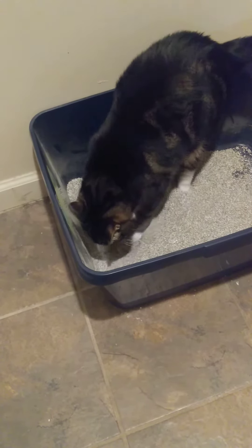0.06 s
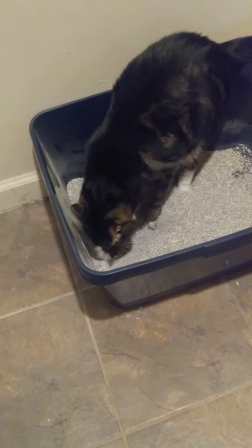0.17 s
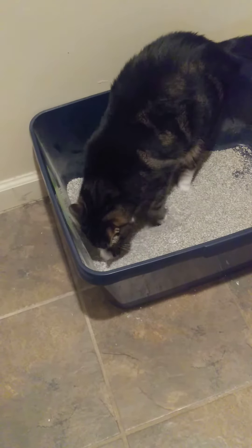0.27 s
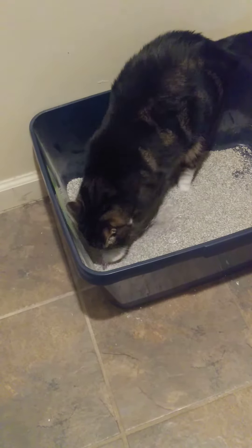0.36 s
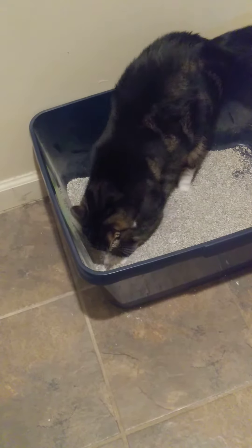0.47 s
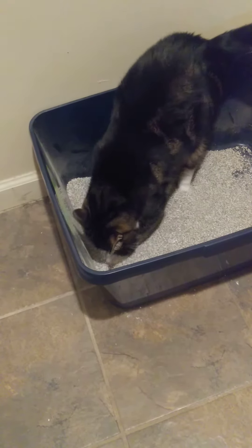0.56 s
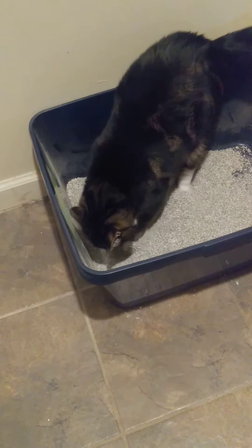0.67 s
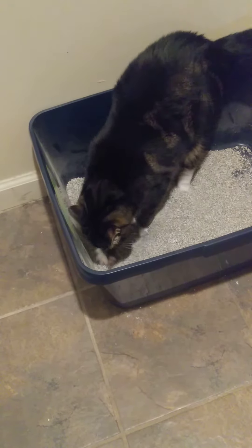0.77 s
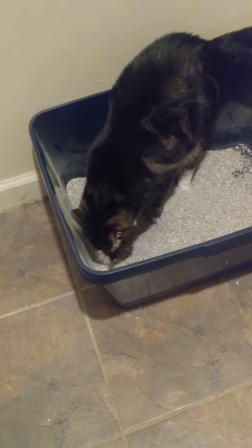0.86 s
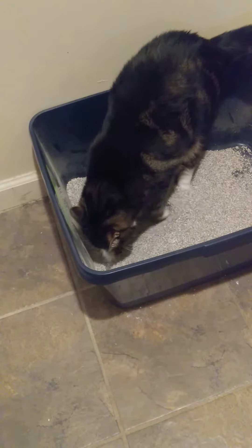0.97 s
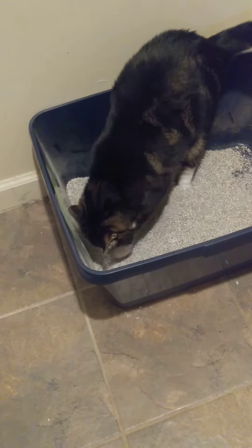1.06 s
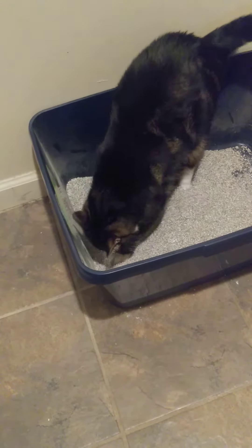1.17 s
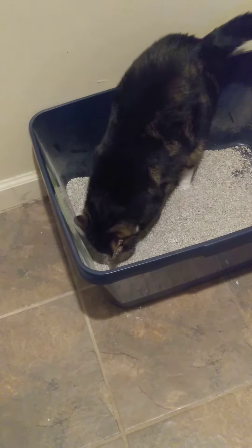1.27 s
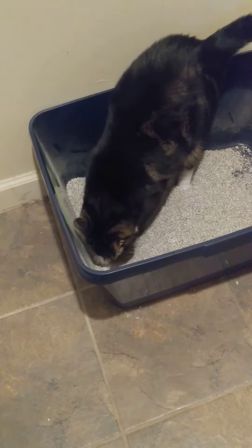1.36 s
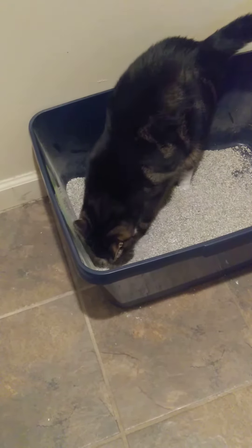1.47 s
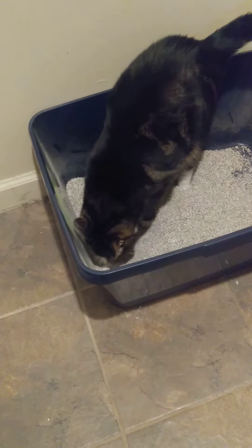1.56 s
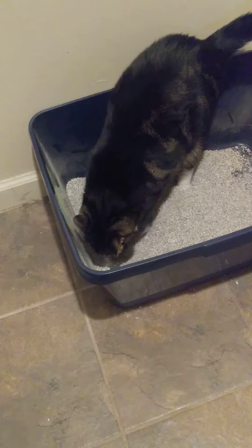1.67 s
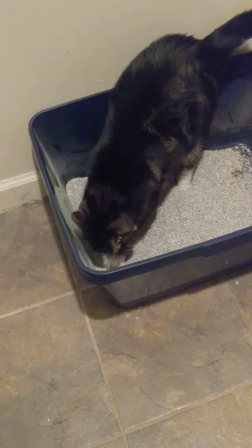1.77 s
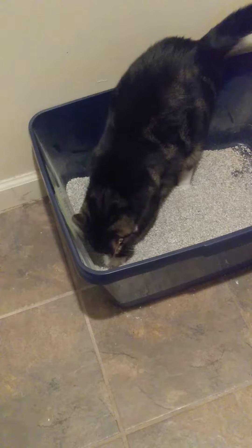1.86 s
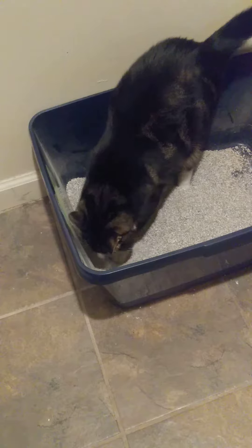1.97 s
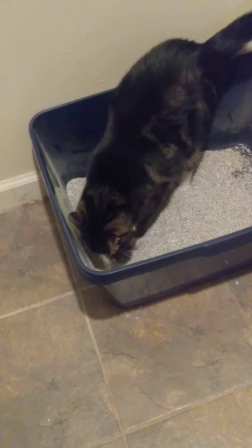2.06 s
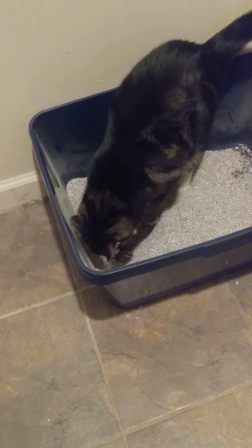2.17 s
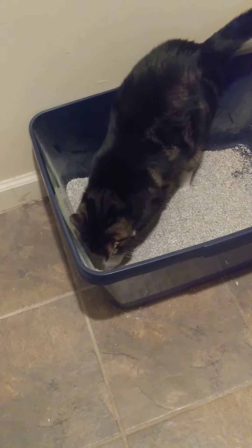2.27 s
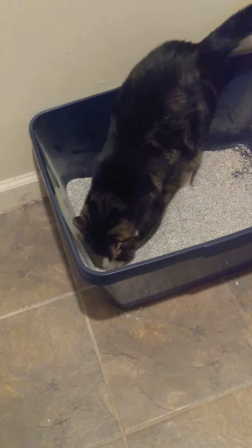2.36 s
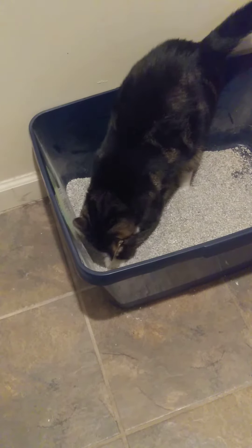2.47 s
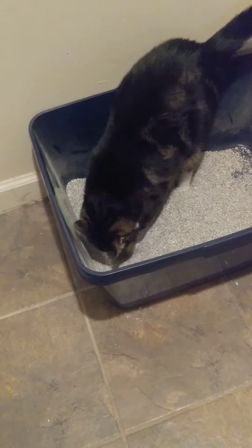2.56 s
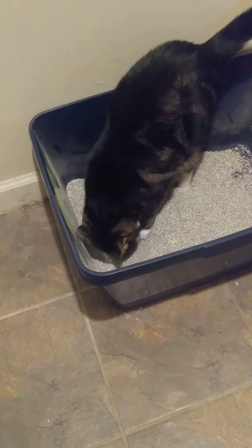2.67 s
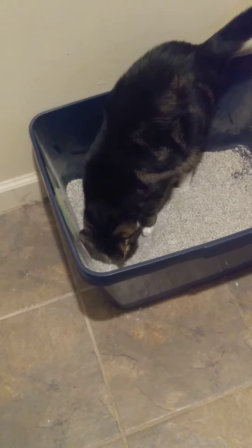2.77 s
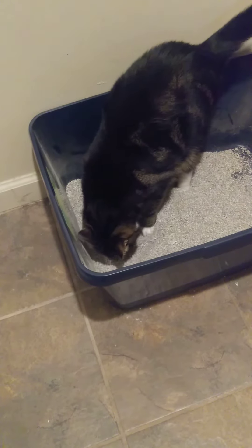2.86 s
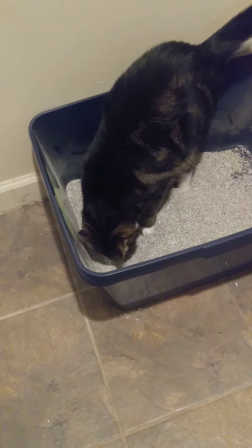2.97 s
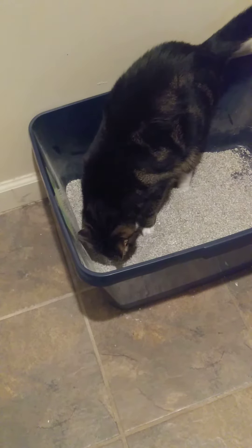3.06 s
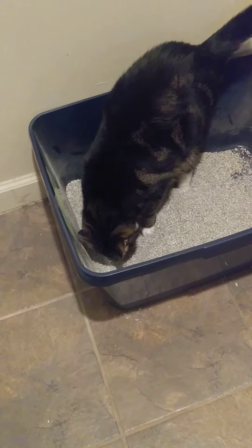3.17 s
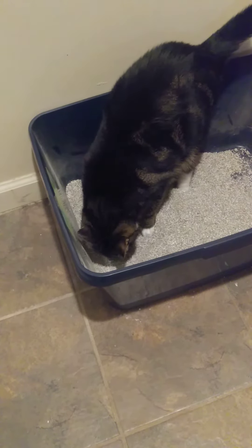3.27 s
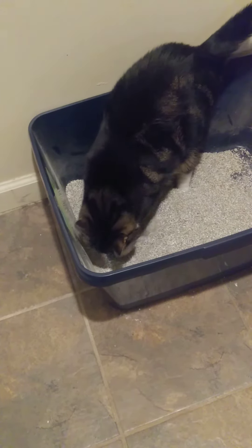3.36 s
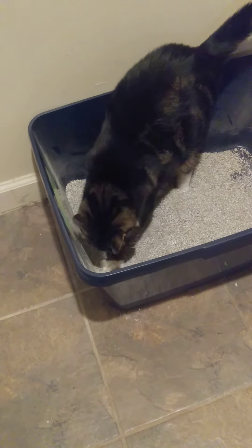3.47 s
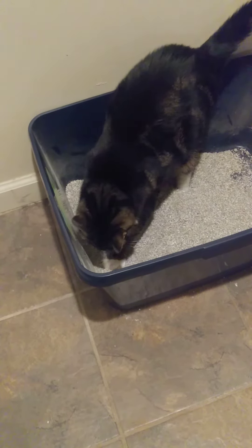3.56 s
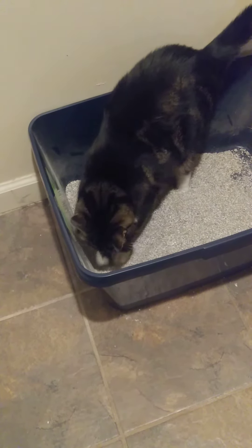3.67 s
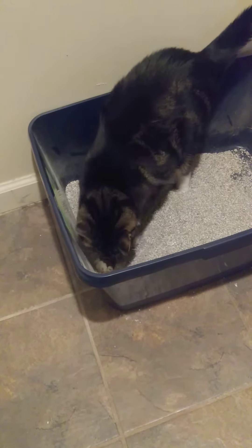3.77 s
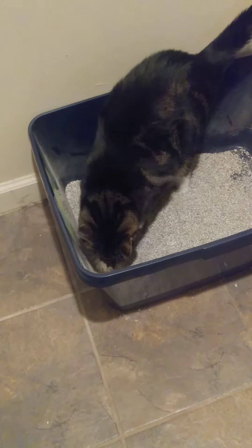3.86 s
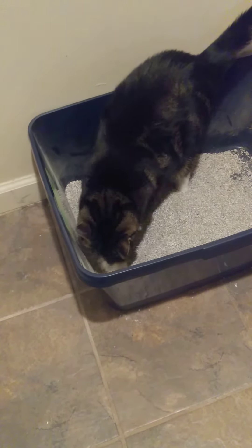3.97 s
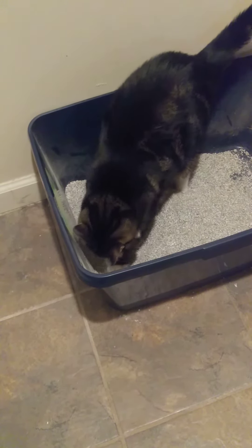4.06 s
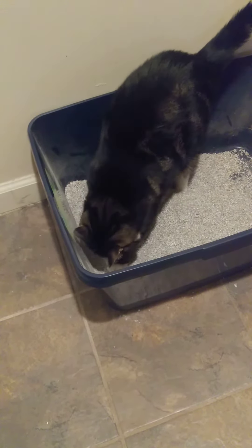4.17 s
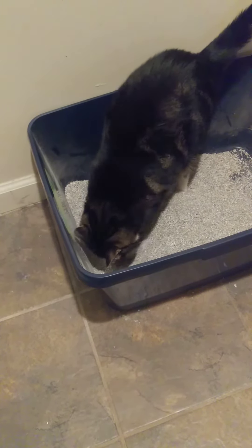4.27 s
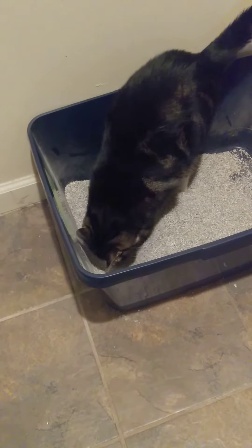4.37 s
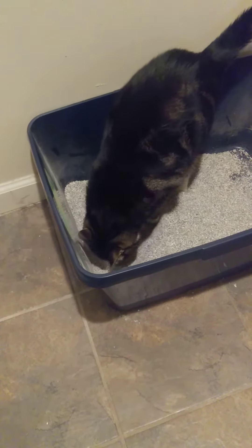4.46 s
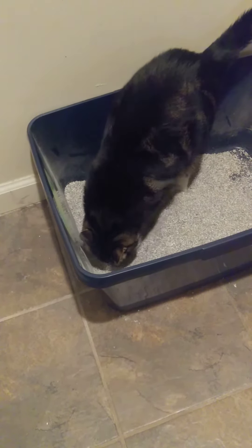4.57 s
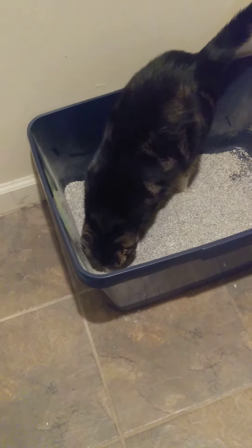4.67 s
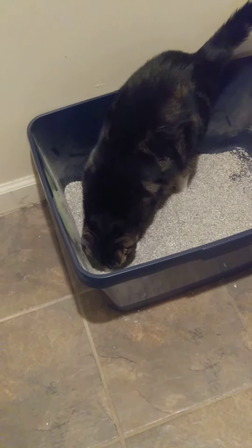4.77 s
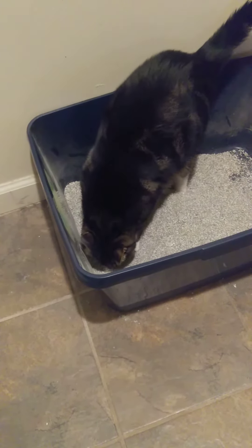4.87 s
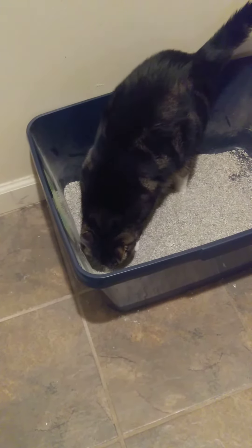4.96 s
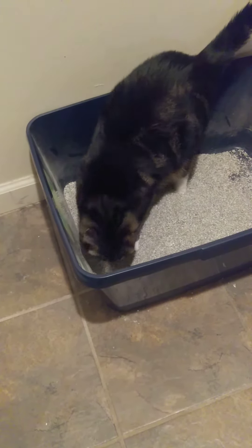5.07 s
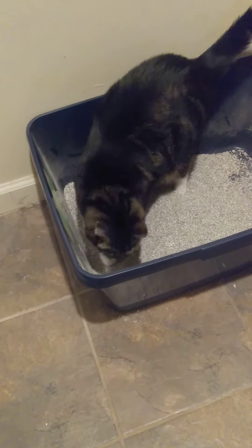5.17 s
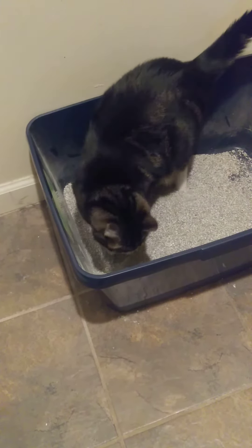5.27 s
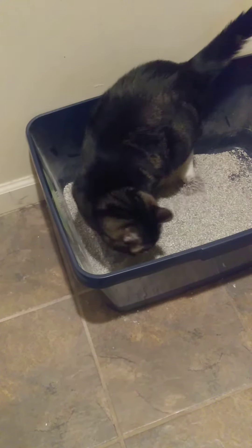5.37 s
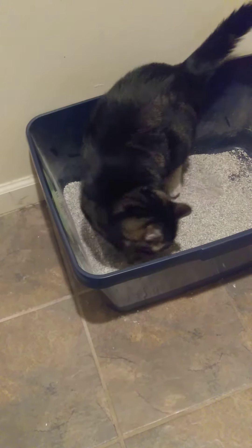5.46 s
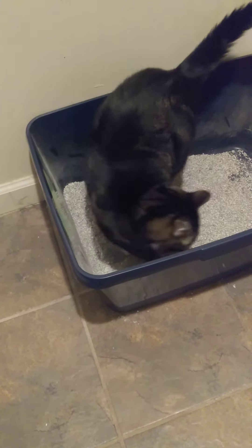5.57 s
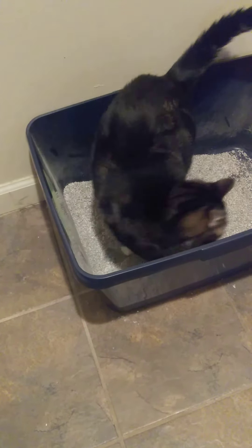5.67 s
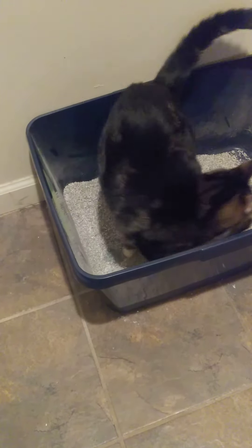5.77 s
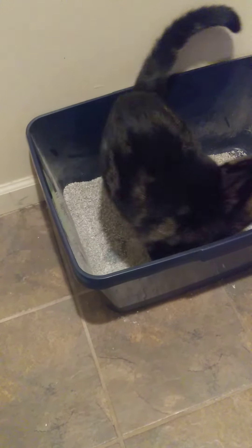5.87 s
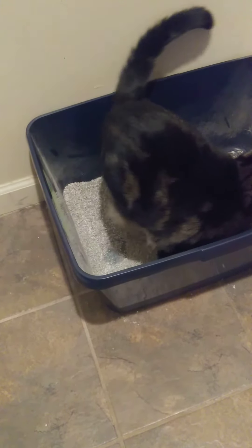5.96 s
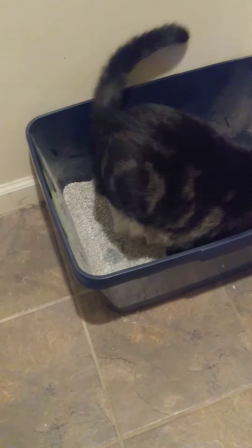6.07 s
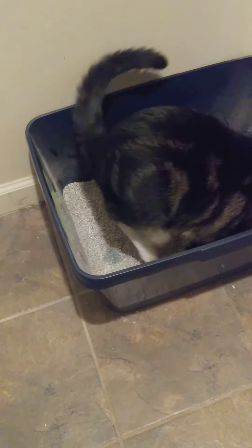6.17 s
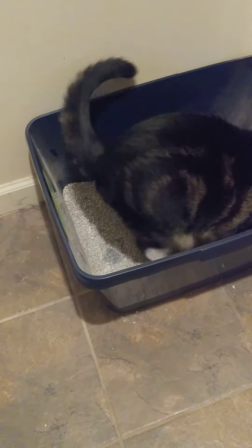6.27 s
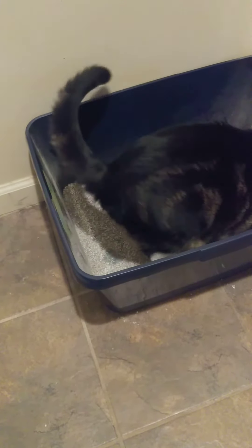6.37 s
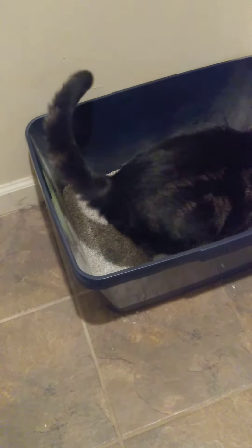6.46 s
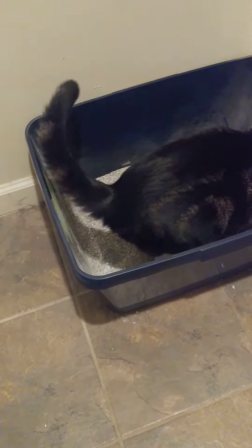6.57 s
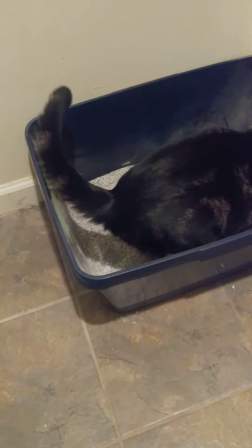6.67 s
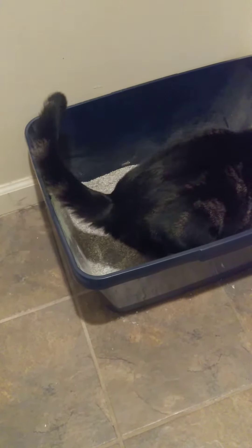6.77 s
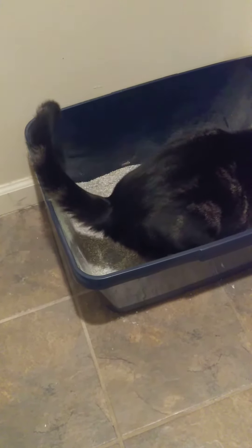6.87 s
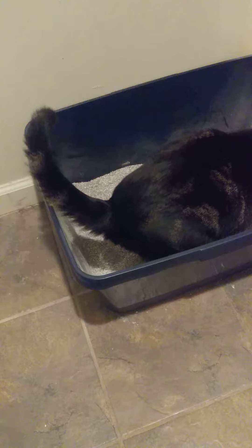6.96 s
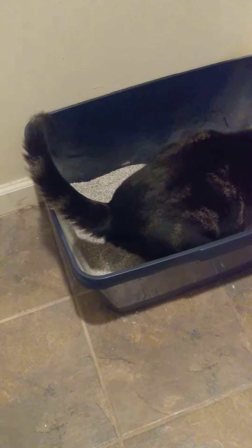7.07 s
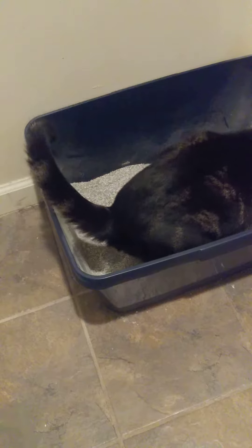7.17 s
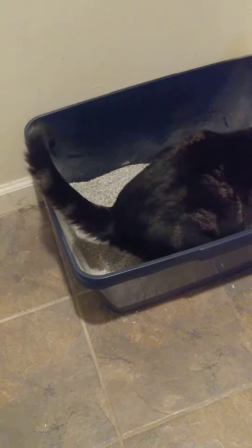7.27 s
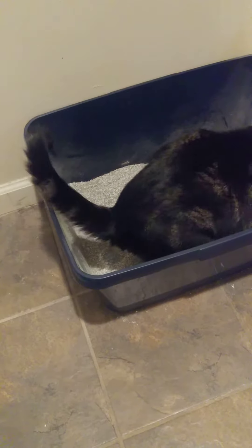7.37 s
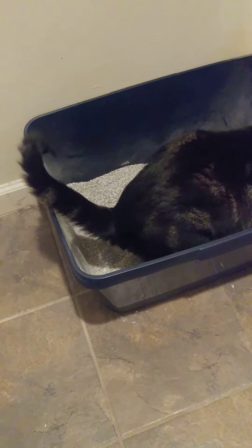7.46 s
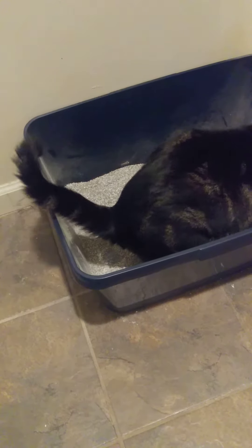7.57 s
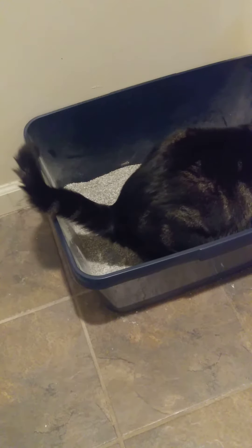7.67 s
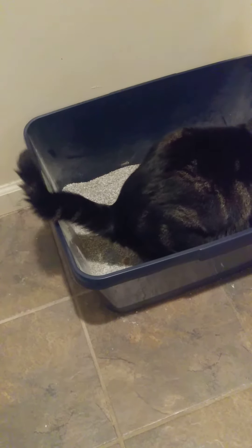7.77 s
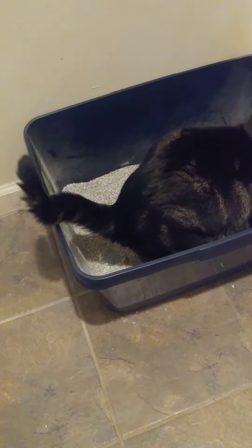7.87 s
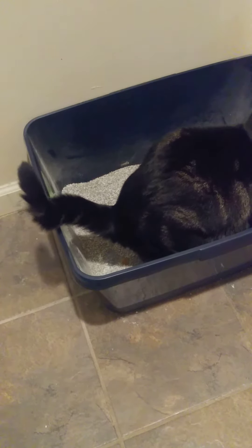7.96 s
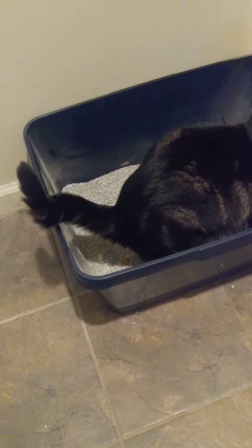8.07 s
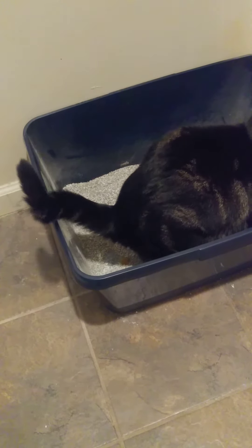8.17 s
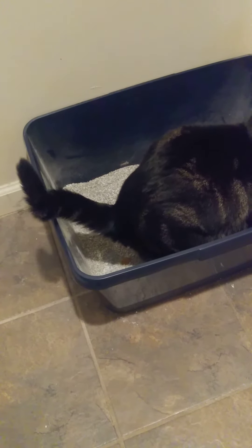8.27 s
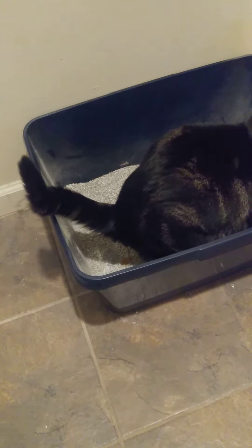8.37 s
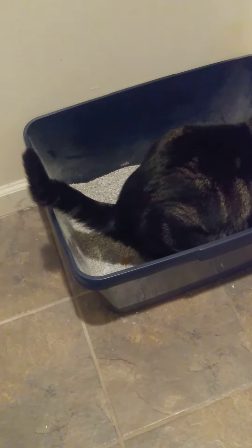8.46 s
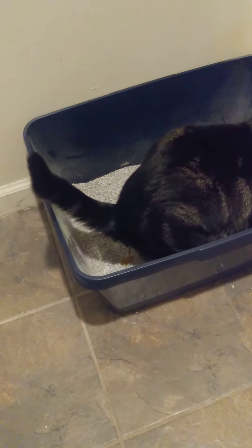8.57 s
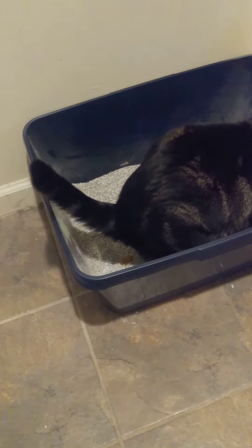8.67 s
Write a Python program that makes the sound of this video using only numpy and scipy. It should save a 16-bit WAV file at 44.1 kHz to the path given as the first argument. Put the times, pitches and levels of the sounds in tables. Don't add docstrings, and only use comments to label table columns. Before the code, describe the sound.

Heard close up on a phone microphone in a hard tiled room, a cat rakes clay litter in a thin plastic tub. From 0 to about 2.6 s, brisk strokes come roughly every third of a second, each starting low and dull and ending in a bright, hissing spray of grains, with smaller flicks between. Soft low thumps land near 0.65 and 1.65 s, the second with a sharp claw crack. A lull follows until 3.4 s, when clicks and light steps lead into more raking from 3.5 to 4.7 s. Sparse ticks follow, a firm step at 5.2 s, then quiet rustling and a cluster of stray grains clicking on plastic around 5.9 to 6.7 s as the cat settles. Afterwards it is almost still, with a few tiny ticks. A faint, steady low motor hum with a buzzing edge and soft room air continue throughout.

```python
import sys
import numpy as np
from scipy import signal
from scipy.fft import rfft, irfft
from scipy.io import wavfile

SR = 44100
rng = np.random.default_rng(int(sys.argv[2]) if len(sys.argv) > 2 else 0)


def file_out(sig):
    cols = np.atleast_2d(sig).T
    lim = np.clip(cols, -1, 1)
    pcm = np.round(lim * 32767).astype(np.int16)
    wavfile.write(sys.argv[1], SR, pcm)


def boost_factor(decibels):
    exponent = np.asarray(decibels, float) / 20
    return 10 ** exponent


N = 384111


def rms_one(x):
    return x / np.sqrt(np.mean(x ** 2) + 1e-20)


def at_hz(points, hz):
    point_hz, point_db = np.transpose(points)
    return np.interp(np.log(hz), np.log(point_hz), point_db)


def colour(x, points):
    size = 8192
    hz = np.arange(size // 2 + 1) * SR / size + 1
    cepstrum = irfft(np.log(boost_factor(at_hz(points, hz))))
    cepstrum[1:size // 2] *= 2
    cepstrum[size // 2 + 1:] = 0
    impulse = irfft(np.exp(rfft(cepstrum)))
    return signal.fftconvolve(x, impulse)[:N]


def drift(rate):
    r = np.exp(-80 * np.pi * rate / SR)
    slow = signal.lfilter([1], [1, -2 * r, r * r], rng.standard_normal(N // 40 + 4002))
    slow = slow[4000:]
    return np.interp(np.arange(N) / 40, np.arange(len(slow)), rms_one(slow))


def resonance(x, hz, width_hz):
    r = np.exp(-np.pi * width_hz / SR)
    poles = [1, -2 * r * np.cos(2 * np.pi * hz / SR), r * r]
    return signal.lfilter([(1 - r * r) / 2, 0, (r * r - 1) / 2], poles, x + 1e-18)


def strokes(t, touch, rise, pull, db, change_db, fall, bend, late=1):
    brush_db, brush_rise = -19, 920
    settle_db, settle_fall = -16, 76
    since = t[:, None] - touch
    rising = np.clip(since / np.maximum(rise, .002), 0, 1) ** bend
    rising += boost_factor(brush_db + brush_rise * np.minimum(since, 0))
    pulled = np.clip((since - rise) / np.maximum(pull, .002), 0, 1) ** late
    lifted = np.maximum(since - rise - pull, 0)
    falling = boost_factor(-2 * fall * lifted) + boost_factor(2 * (settle_db - settle_fall * lifted))
    return np.sum((rising * boost_factor(db + change_db * pulled)) ** 2 * falling, axis=1)


def efforts(t):
    # (touch [s], rise [s], pull [s], rake [dB], spray [dB])
    rake_strokes = [(-.04, 0.1, 0.027, -23.5, -23), (0.277, 0.12, 0.13, -27, -26.5),
                    (0.614, 0.065, 0.056, -24, -24), (0.974, 0.067, 0.03, -20, -22.5),
                    (1.283, 0.06, 0.058, -23, -24), (1.648, 0.016, 0.092, -22, -24.5),
                    (1.913, 0.067, 0.098, -27, -29), (2.207, 0.055, 0.08, -26, -31),
                    (2.484, .053, 0.068, -23.5, -25), (3.56, 0.082, 0.0077, -29.5, -32.5),
                    (3.681, 0.066, 0.011, -21.5, -27), (3.92, 0.024, .01, -44, -42),
                    (4.025, 0.062, 0.027, -26.5, -29.5), (4.194, .06, 0.036, -22, -23),
                    (4.499, .025, 0.077, -30.5, -26.5)]
    # (touch [s], rise [s], pull [s], rake [dB], spray [dB])
    light_steps = [
        (3.42, 0.0056, 0.0092, -41, -52),
        (3.48, .016, .008, -47, -53),
        (5.198, 0.02, 0.04, -33.5, -38.5),
        (5.592, 0.0098, 0.0054, -64, -57),
        (5.73, 0.0092, 0.024, -48, -51.5),
        (6.0, 0.069, .025, -43, -42),
        (6.17, 0.0076, 0.02, -48, -63),
        (6.285, 0.037, .006, -48, -47),
        (6.415, 0.015, 0.018, -44.5, -51),
        (6.565, 0.0086, 0.061, -48, -46),
    ]
    # (touch [s], rise [s], pull [s], rake [dB], spray [dB])
    toe_flicks = [(.07, 0.017, 0.011, -40, -24), (0.294, 0.013, 0.0087, -28.5, -41),
                  (.49, .04, 0.023, -34, -31.5), (.72, 0.022, 0.018, -44, -21.5),
                  (1.05, 0.0087, .015, -38, -17.5), (1.4, 0.022, 0.03, -46, -27.5),
                  (1.73, 0.022, 0.037, -36, -29.5), (2.05, 0.015, 0.027, -42, -23.5),
                  (2.325, 0.016, 0.028, -26, -25.5), (3.745, 0.0066, 0.014, -38, -22.5),
                  (4.6, .02, .02, -42, -30), (4.68, .02, .07, -56, -45), (1.17, 0.018, .05, -40, -44),
                  (4.0, 0.017, .015, -46, -42), (6.13, 0.018, 0.024, -48, -46)]
    # (touch [s], rise [s], hold [s], dig [dB], tub push [dB])
    paw_digs = [(-.03, 0.024, 0.082, -31, -38.5), (0.267, 0.16, .02, -28.5, -41.5),
                (0.587, 0.026, 0.14, -36, -41.5), (0.967, 0.037, 0.056, -28.5, -34.5),
                (1.28, 0.08, 0.01, -26.5, -46), (1.649, 0.005, 0.043, -29, -39),
                (1.903, 0.078, 0.083, -32.5, -44.5), (2.213, 0.017, 0.064, -29, -46),
                (2.477, 0.064, .015, -26, -38), (3.565, 0.055, .03, -30, -51),
                (3.694, 0.022, 0.026, -31.5, -60), (3.919, 0.041, .006, -37, -49),
                (4.012, 0.056, 0.01, -29, -42), (4.19, 0.04, 0.038, -27, -37),
                (4.498, 0.033, 0.016, -29.5, -48), (5.198, .03, 0.029, -40, -51),
                (6.023, 0.028, 0.043, -44.5, -51), (6.414, 0.031, .01, -52, -56)]
    # (time [s], level [dB])
    bed_rustle = [
        (2.9, -79),
        (3.4, -66),
        (3.5, -54.5),
        (4.85, -70.5),
        (5.0, -68),
        (5.4, -65),
        (5.9, -57),
        (6.25, -57.5),
        (6.6, -62),
        (6.85, -67),
    ]
    touch, rise, pull, rake_db, spray_db = np.transpose(rake_strokes + light_steps + toe_flicks)
    land, sink, hold, dig_db, push_db = np.transpose(paw_digs)
    rustle = boost_factor(np.interp(t, *np.transpose(bed_rustle))) ** 2

    push = strokes(t, land, sink, hold, push_db, change_db=-10.5, fall=52, bend=0.82)
    dig = strokes(t, land, sink, hold, dig_db, change_db=-1.5, fall=260, bend=0.82)
    rake = strokes(t, touch, rise, pull, rake_db, change_db=-6.5, fall=180, bend=1.42)
    early, swell_db = 0.43, 6
    spray = strokes(t, touch, early * rise, pull + (1 - early) * rise, spray_db - swell_db,
                    change_db=swell_db, fall=205, bend=1, late=0.53)

    push = 10 * np.log10(push + boost_factor(2 * 2) * rustle)
    dig = 10 * np.log10(dig + boost_factor(2 * -1.5) * rustle)
    rake = 10 * np.log10(rake + rustle)
    spray = 10 * np.log10(spray + boost_factor(2 * 3) * rustle)
    dust = boost_factor(2 * (2.2 + 0.57 * spray + 0.59 * rake)) + boost_factor(2 * 0.5) * rustle
    return np.array([push, dig, rake, spray, 10 * np.log10(dust)])


def paws():
    # (frequency [Hz], level [dB])
    grain_levels = [(170, -14), (300, -4), (450, -15), (700, -9.5), (1200, -16), (2200, -14), (3000, -12),
                    (6000, -13), (8000, -14.5), (16000, -10.5)]
    effort_hz = [300, 850, 2400, 6500, 13000]
    hits_per_s, sharpness, count = 30000, 5.1, 40
    s, t = np.arange(0, N + 44, 44) / SR, np.arange(N) / SR
    effort_db = efforts(s)
    sizes = boost_factor(1.0 * np.minimum(rng.exponential(1, N), 5)) * rng.choice([-1, 1], N)
    clumps = boost_factor(0.78 * drift(55))
    hits = sizes * (rng.random(N) < hits_per_s / SR) * clumps
    pitches = np.geomspace(170, 15500, count)
    odds = np.sqrt(pitches)
    dealt = rng.choice(count, N, p=odds / odds.sum())
    lumps = [drift(22.4) for _ in range(count // 4)]
    out = 0
    for k, hz in enumerate(pitches):
        shares = [at_hz(np.c_[effort_hz, row], hz) for row in np.eye(len(effort_hz))]
        patches = boost_factor(0.76 * drift(7.3) + 1.5 * lumps[k // 4])
        struck = hits * (dealt == k) * patches
        rings = rms_one(resonance(resonance(struck, hz, hz / sharpness), hz, hz / 2))
        out = out + boost_factor(at_hz(grain_levels, hz) + np.interp(t, s, shares @ effort_db)) * rings
    return out


def tub(x):
    # (frequency [Hz], width [Hz], level [dB])
    wall_modes = [(325, 21, -21), (620, 87, -6.5), (698, 16.7, -15), (777, 9.9, -16), (987, 42, -4),
                  (1289, 36, 3.5), (1397, 44, -3.5), (1564, 180, -4), (1872, 160, -3), (2146, 137, 0),
                  (3465, 43, 1), (3940, 90, -8.5), (5900, 77, -3), (6570, 140, -12)]
    rings = sum(boost_factor(db) * resonance(x, hz, width) for hz, width, db in wall_modes)
    return x + rings


def room(x):
    t60_s = 0.31
    t = np.arange(int(.5 * SR)) / SR
    low, high = rng.standard_normal((2, len(t)))
    low = signal.lfilter([.3], [1, -.7], low) * boost_factor(-60 * t / t60_s)
    high = .5 * high * boost_factor(-60 * t / (0.48 * t60_s))
    tail = (low + high) * (t > .004)
    return signal.fftconvolve(x, tail / np.sqrt(np.sum(tail ** 2)))[:N]


def motor():
    # (multiple of rotor speed [-], rms level [dB])
    hum_tones = [(1, -72), (2, -74.5), (4, -45.5), (6, -55.5), (7, -64.5), (14, -69), (16, -70),
                 (17, -71.5), (19, -65.5), (20, -74.5), (21, -73), (23, -81), (24, -74)]
    # (frequency [Hz], width [Hz], rms level [dB])
    panels = [(164, 12, -66.5), (256, 4.9, -54.5), (292.6, 7.4, -54.5), (344, 43, -62), (394, 13, -61.5),
              (507.5, 34, -62), (1297, 48, -70.5)]
    # (frequency [Hz], width [Hz], level [dB])
    casing_rings = [(1738, 43, -68), (2260, 12, -71.5), (2280, 7, -74.5), (2665, 81, -72), (3240, 68, -77),
                    (3410, 22, -73.5), (2170, 420, -71)]
    rotor_hz, knock_hz = 59.24, 29.76
    turns = np.cumsum(rotor_hz * (1 + 0.000591 * drift(0.475))) / SR
    out = np.zeros(N)
    for k, db in hum_tones:
        tone = np.sin(2 * np.pi * (k * turns + rng.random()))
        out += np.sqrt(2) * boost_factor(db + .6 * drift(2.2)) * tone
    for hz, width, db in panels:
        out += boost_factor(db) * rms_one(resonance(rng.standard_normal(N), hz, width))
    knocks = np.diff(np.floor(turns * knock_hz / rotor_hz), prepend=0) * boost_factor(1.5 * drift(15))
    knocks += .02 * rng.standard_normal(N)
    for hz, width, db in casing_rings:
        rings = resonance(resonance(knocks, hz, width), hz, 3 * width)
        out += boost_factor(db + 0.77 * drift(5.6)) * rms_one(rings)
    return out


def moving_air():
    # (frequency [Hz], density [dB per Hz])
    air_spectrum = [(25, -61), (45, -45), (70, -21.5), (120, -17.5), (200, -5), (350, -4), (450, -12.5),
                    (700, -11.5), (1100, -18.5), (1900, -25), (2500, -24), (4000, -31), (8000, -38.5),
                    (16000, -54)]
    return boost_factor(-50 + .5 * drift(0.49)) * rms_one(colour(rng.standard_normal(N), air_spectrum))


def thumps():
    # (time [s], peak level [dB])
    blows = [
        (0.651, -27.5),
        (1.653, -24),
        (4.219, -43),
    ]
    kicks = np.zeros(N)
    for s, db in blows:
        kicks[round(s * SR)] = boost_factor(db + 30)
    return resonance(resonance(kicks, 70, 120), 90, 400)


def dying(at, db, t60):
    kicks = np.zeros(N)
    kicks[at] = boost_factor(db)
    return signal.lfilter([1], [1, -boost_factor(-60 / (t60 * SR))], kicks + 1e-18)


def ticks():
    # (time [s], peak [dB], dull
    # part [dB], top part [dB])
    wall_ticks = [(1.233, -25.5, -13, -17), (1.603, -32.5, -22, 1), (1.6525, -14.5, -12, -13),
                  (2.2233, -26.5, -2.5, 6), (2.2752, -37, 12, -4), (3.41, -38, -21, 1),
                  (3.4237, -32, -19, -2), (3.427, -24.5, -12, -5), (3.451, -35, -7, 6),
                  (3.9556, -55, -14, 0), (4.0045, -34, -9, 8.5), (4.0288, -18, -29, 7.5),
                  (4.5096, -27, -7, -4), (4.627, -19, -20, 10), (4.697, -38, -21, 7), (4.756, -41, -18, 5),
                  (4.846, -43, -24, -3), (4.891, -39.5, -21, -4), (5.0382, -40.5, -19, -4),
                  (5.0977, -46, -15, -6), (5.1366, -46, -12, 2), (5.1556, -47, -14, 5), (5.205, -30, -15, 3),
                  (5.231, -24, -13, -12), (5.284, -40, -6, -5),
                  (5.3603, -39, -16, -1), (5.4331, -48, -11, 6), (5.5023, -44, -18, 10),
                    (5.5407, -46, -16, 6), (5.5524, -49, -14, 6), (5.591, -42, -19, 3),
                    (5.6017, -37, -21, -5), (5.6344, -47, -17, -3), (5.7336, -33.5, -20, -8),
                    (5.9473, -44, -15, 2), (5.9607, -35, -10, 1), (6.087, -25, -11, -2),
                    (6.0984, -45, -9, 1), (6.1753, -34, -14, 0), (6.239, -39, -20, 4), (6.272, -37, -14, 3),
                    (6.288, -40, -22, 4), (6.2973, -37, -23, 2), (6.31, -26, -19, 3), (6.3877, -37, -13, 2),
                    (6.4317, -37, -7, -12), (6.571, -26.5, -16, -8), (6.5905, -37, -18, -4),
                    (6.603, -36, -12, 8), (6.6292, -29, -11, 3), (6.6594, -40, -14, -2),
                    (7.0418, -52, -10, -1), (7.1794, -51, -7, -3), (7.9094, -53, -4, 4)]
    s, peak_db, dull_db, top_db = np.transpose(wall_ticks)
    lag_s = .002
    at = np.round((s + lag_s) * SR).astype(int)
    pitches = np.geomspace(1900, 14500, 8)
    chance = rng.standard_normal((len(at), len(pitches)))
    out = 0
    for k, hz in enumerate(pitches):
        part_db = 0
        if hz < 3200:
            part_db = dull_db + 16.5
        elif hz > 10300:
            part_db = top_db
        db = peak_db + part_db + 0.75 * chance[:, k]
        snap = -dying(at, db - 0.5, t60=0.00016)
        crack = dying(at, db - 5.5, t60=0.0053)
        trickle = dying(at, db - 15.5, t60=0.085)
        out = out + resonance(snap + (crack + trickle) * rng.standard_normal(N), hz, hz / 1.84)
    high_pass = signal.butter(4, 1600, "high", fs=SR, output="sos")
    return boost_factor(-0.5) * signal.sosfilt(high_pass, out)


def scene():
    litter = tub(paws() + ticks())
    echo = boost_factor(-8) * room(litter)
    return (litter + echo + thumps() + motor() + moving_air())[None]


def roll_off(x):
    return signal.sosfilt(signal.butter(12, 16940, fs=SR, output="sos"), x)


def record(dry):
    # (frequency [Hz], gain [dB])
    capsule = [(20, -3), (7500, 0), (8300, -2), (8900, 6), (9500, 6.5), (10100, -1), (11000, -9.5),
               (13000, -15), (16000, -13)]
    hiss = boost_factor(-74) * signal.lfilter([1, -.6], [1], rng.standard_normal(N))
    steep_cut = signal.ellip(12, .5, 70, 15830, fs=SR, output="sos")
    mix = signal.sosfilt(steep_cut, colour(dry[0], capsule) + hiss)
    return roll_off(mix[None])


dry = scene()
out = record(dry)
file_out(out)
```